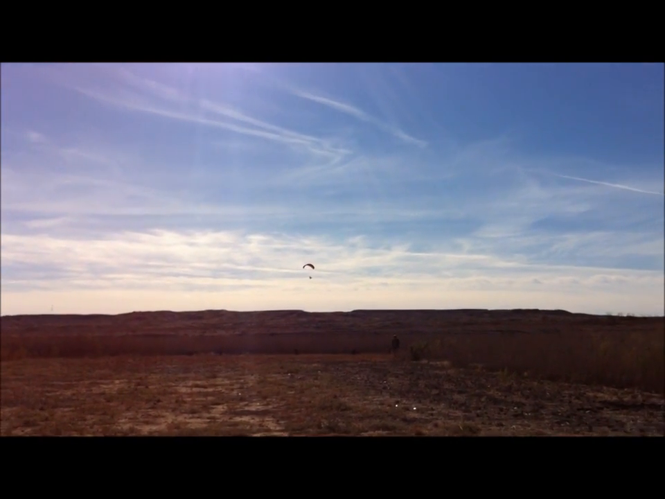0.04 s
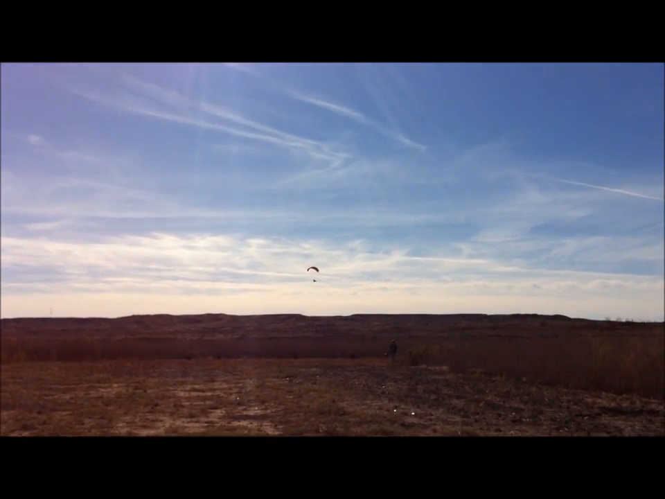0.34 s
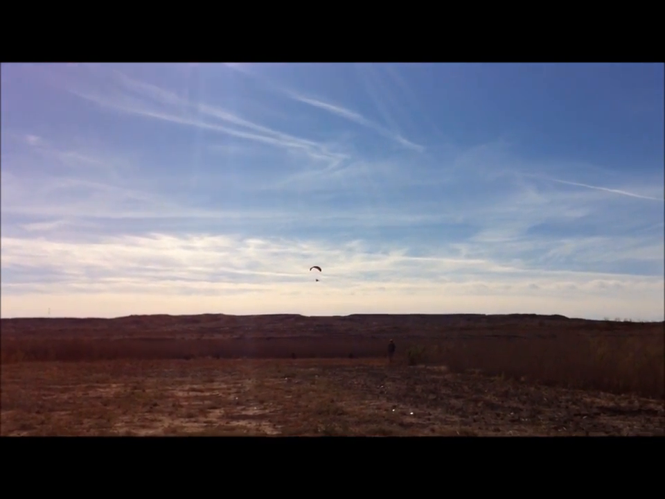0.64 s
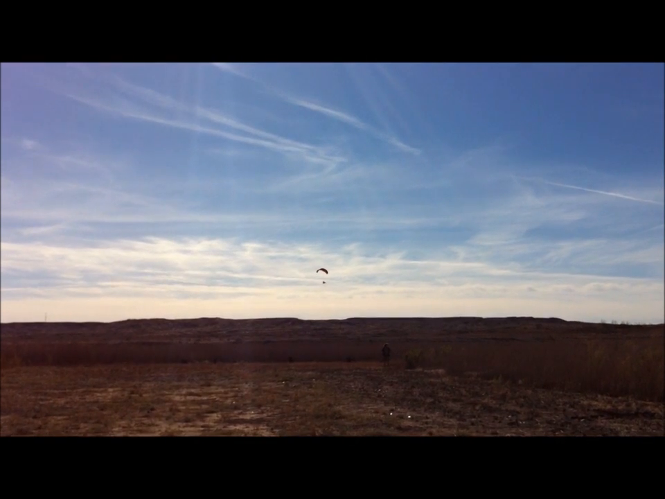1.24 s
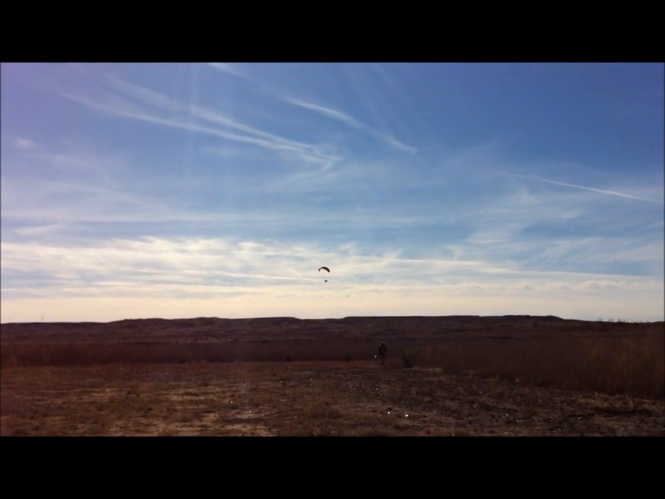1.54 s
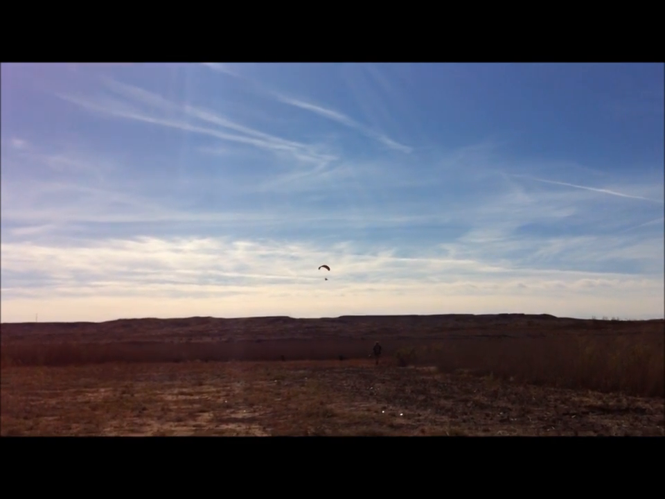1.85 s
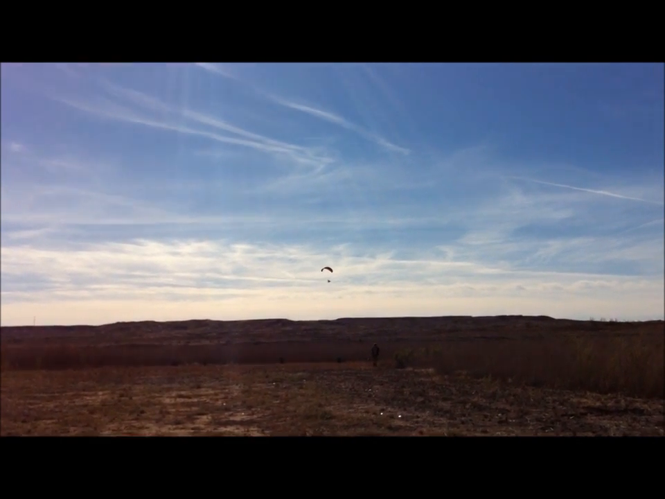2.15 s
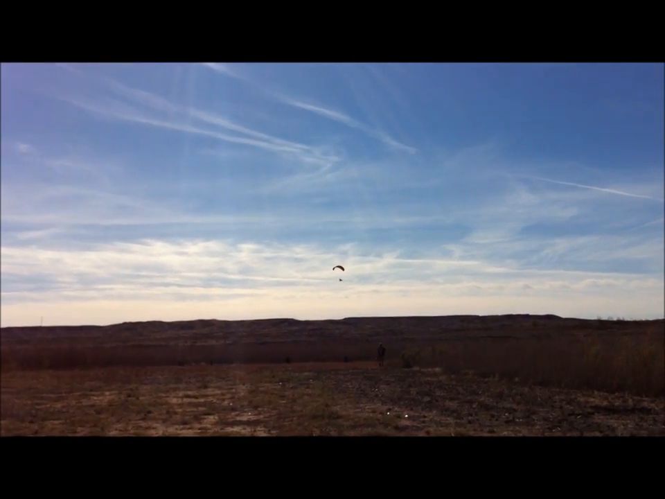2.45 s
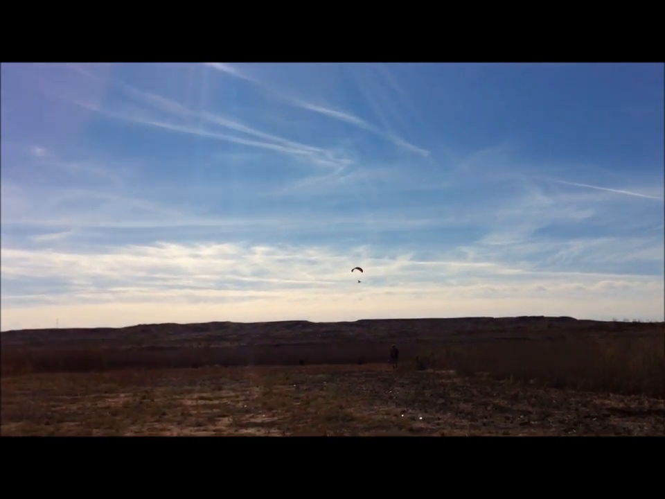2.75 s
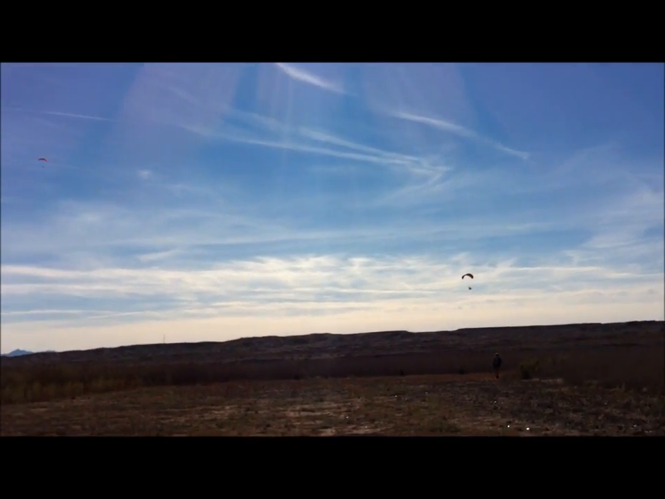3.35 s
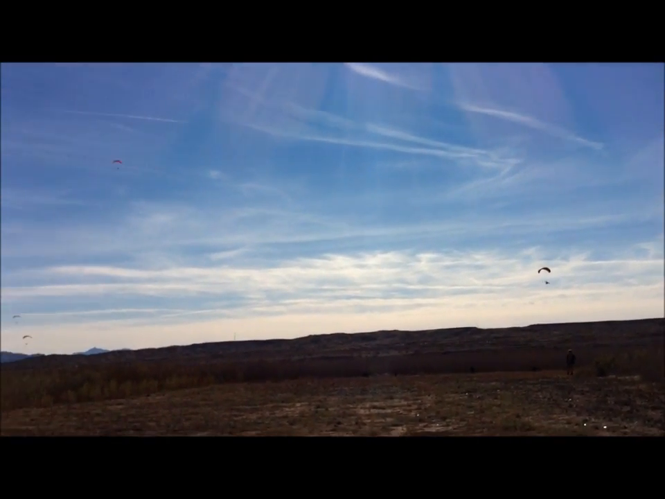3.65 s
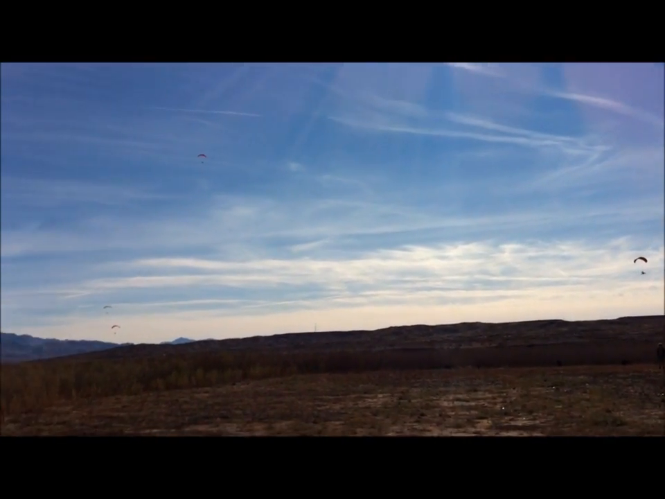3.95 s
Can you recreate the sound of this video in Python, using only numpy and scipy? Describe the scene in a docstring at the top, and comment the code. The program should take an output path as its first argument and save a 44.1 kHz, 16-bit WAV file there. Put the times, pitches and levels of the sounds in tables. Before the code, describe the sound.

A distant powered paraglider drones steadily, with light wind rumble and a few handling clicks.

```python
"""A powered paraglider drones far off over open dry land, slowly getting nearer and brighter.
Its engine and geared-down propeller make two interleaved buzzes that flutter in the moving air,
over a rush of air chopped by the blades. Close up, light wind rumbles and bumps on the microphone,
and a hand shifting on the camera makes a short run of clicks and rubs. Faint hiss lies under it all."""
import sys
import numpy as np
from scipy import signal
from scipy.fft import rfft, irfft
from scipy.io import wavfile
from scipy.ndimage import uniform_filter1d

SR = 44100
rng = np.random.default_rng(int(sys.argv[2]) if len(sys.argv) > 2 else 0)


def wav_record(signal):
    """Record a signal, one row per channel, as 16-bit PCM in the file named by sys.argv[1]."""
    frames = np.transpose(np.atleast_2d(signal))
    bounded = np.clip(frames, -1, 1)
    # unit amplitude maps onto the largest positive 16-bit level
    quanta = np.round(bounded * 32767).astype(np.int16)
    wavfile.write(sys.argv[1], SR, quanta)


N = 176400
T = np.arange(N) / SR

# engine speed (time [s], firing rate [Hz])
ENGINE_SPEED = [(0, 95.25), (.8, 95.56), (1.15, 95.4), (1.45, 95.58), (2.15, 95.38), (2.52, 94.84),
                (3.1, 94.82), (3.7, 94.44), (4, 94.15)]
# how the drone carries to the microphone (time [s], gain [dB], low-middle gain [dB], treble gain [dB])
CARRY = [(0, -7, 6.5, -3), (.3, -1, 0.5, -22), (.7, -2.5, -2, -12), (1.25, -4, -2.8, -8.5),
         (1.8, -3.5, 0, -4), (2.35, -2.2, 1.5, -4), (2.65, -1.9, -.5, -3.5), (2.87, -1, -1, 1.5),
         (3.1, -2, -1.5, 3.5), (3.62, -1.5, -1, 5), (4, -1.5, -1, -8)]
# exhaust harmonics from the first up, before the carry gains (level [dB])
EXHAUST_HARMONICS = [-68, -52, -57, -55.5, -54, -58, -63.5, -61, -69, -65.5, -96, -74, -63, -65.5, -66.5,
                     -68.5, -67, -69.5, -84, -72, -78.5, -81.5, -79.5, -85]
# propeller harmonics from the first up, before the carry gains (level [dB])
BLADE_HARMONICS = [-91, -54, -58, -61, -59, -65.5, -67, -71, -64.5, -57.5, -56, -66, -58, -62.5, -64.5,
                   -70.5, -81.5, -67.5, -75, -68, -73.5]
# air rushing off the propeller (frequency [Hz], relative level [dB])
RUSH_SPECTRUM = [(60, -31), (130, -17), (300, 3), (500, 5), (700, -0.5), (950, -0.5), (1250, 1.5),
                 (1680, -4.5), (1850, -8.5), (2500, -15.5), (3300, -41)]
# wind rumble on the microphone (frequency [Hz], relative level [dB])
WIND_SPECTRUM = [(20, -24), (42, -53), (65, -14.5), (90, -4), (140, 3), (220, -1.5), (350, -29), (700, -10),
                 (2000, -51.5)]
# gusts at the microphone (time [s], level [dB])
GUSTS = [(0, -43.5), (.4, -57.5), (.56, -50.5), (.7, -66), (1.3, -62), (1.47, -49), (1.65, -64.5),
         (2.03, -48.5), (2.35, -73.5), (2.85, -65), (3.12, -50.5), (3.65, -54.5), (3.85, -66), (4, -45)]
# puffs of wind, before the microphone's response (time [s], peak level [dB], pitch [Hz])
PUFFS = [(.060, -29, 217), (0.097, -29.5, 165), (0.172, -26, 189), (.195, -26, 167), (0.318, -28, 177),
         (0.548, -31.5, 137), (.570, -31, 136), (1.465, -32, 208), (1.494, -28.5, 190), (1.534, -30, 192),
         (1.879, -27, 163), (1.894, -25.5, 202), (2.161, -26, 224), (2.633, -33, 146), (3.108, -32, 140),
         (3.236, -25, 193), (3.364, -30, 175), (3.703, -30, 176)]
# the microphone's response to a puff (frequency [Hz], gain [dB])
PUFF_RESPONSE = [(35, -26), (100, -4), (220, -2), (360, 3.5), (600, 26)]
# handling clicks, before filtering (time [s], snap level [dB], tick level [dB], knock level [dB])
CLICKS = [(.868, -67, -49, -50), (1.4303, -44, -54, -50), (1.7635, -46.5, -48, -55),
          (1.827, -34.5, -47, -28.5), (1.854, -43, -53, -55), (1.8904, -36, -51, -31),
          (1.976, -44, -47, -56), (1.9965, -53, -46, -53), (2.110, -53, -50, -37), (2.155, -48, -72, -25),
          (2.197, -41, -45, -51), (2.2211, -35.5, -62, -24.5), (2.2539, -29, -56, -25.5),
          (2.302, -43, -50, -35), (2.3502, -38, -46, -23.5), (2.3667, -37.5, -50, -25.5)]
# colour of the camera shell (frequency [Hz], gain [dB])
SHELL_RESPONSE = [(1500, -3), (3000, -9), (4300, -8), (5600, -5), (9000, -7), (16000, -4)]
# fingers rubbing on the shell (time [s], level [dB])
RUB_LEVEL = [(1.68, -94), (1.88, -59), (1.93, -71), (1.98, -67), (2.1, -70), (2.265, -94), (2.31, -68.5),
             (2.38, -63), (2.46, -68)]
# the microphone's own hiss (frequency [Hz], relative level [dB])
HISS_SPECTRUM = [(20, 15), (1000, 12.5), (3000, 6.5), (11000, 3.35), (16000, 3)]


def paraglider(blades_per_firing=.8449):
    """Far off, exhaust and propeller buzz, locked together by the reduction drive."""
    firing_hz = curve(ENGINE_SPEED)
    blade_hz = firing_hz * blades_per_firing
    exhaust = buzz(firing_hz, EXHAUST_HARMONICS)
    propeller = buzz(blade_hz, BLADE_HARMONICS) + propeller_rush(blade_hz)
    return amp(curve(CARRY)) * (exhaust + propeller)


def buzz(pulse_hz, levels_db, jitter_s=.00003, pulse_spread=.18, flutter_hz=2.2):
    """A train of sharp, slightly uneven pulses; the air on the way makes each harmonic flutter."""
    mean_hz = pulse_hz.mean()
    log_gain = np.log(amp([levels_db[0], *levels_db, *levels_db[::-1]]))
    lags = signal.hilbert(log_gain).imag[1:len(levels_db) + 1]  # minimum phase keeps the pulses sharp
    turns = np.cumsum(pulse_hz) / SR + pulse_hz * jitter_s * drift(mean_hz / 2)
    out = np.zeros(N)
    for harmonic, (db, lag) in enumerate(zip(levels_db, lags), start=1):
        hz = harmonic * mean_hz
        flutter_db = (2.08 * hz / 1000 - .36) * drift(flutter_hz)  # deeper toward the treble
        out += amp(db + flutter_db + carry_db(hz)) * np.cos(2 * np.pi * harmonic * turns - lag)
    return np.sqrt(2) * out * (1 + pulse_spread * drift(mean_hz / 2))


def propeller_rush(blade_hz, gain_db=-51.5, chop_depth=.23, patch_db=2.5):
    """Patchy air noise, chopped once by every blade."""
    hz, t, spectra = signal.stft(rng.standard_normal(N), SR, nperseg=1024, noverlap=768)
    patches = uniform_filter1d(rng.standard_normal(spectra.shape), size=7, axis=0)
    patches = unit(uniform_filter1d(patches, size=24, axis=1))
    spectra *= colour(RUSH_SPECTRUM, hz)[:, None] * amp(patch_db * patches + carry_db(hz[:, None], t))
    air = signal.istft(spectra, SR, nperseg=1024, noverlap=768)[1][:N]
    chop = 1 + chop_depth * np.cos(2 * np.pi * np.cumsum(blade_hz) / SR)
    return amp(gain_db) * unit(air * chop)


def carry_db(hz, t=T, low_middle_hz=620, middle_hz=980, treble_hz=1770, edge_width_hz=150):
    """Over the distance to the microphone, the treble and the low middle swell and fade separately."""
    top, middle = (.5 + .5 * np.tanh((hz - edge) / edge_width_hz) for edge in (treble_hz, middle_hz))
    treble = .81 * top + .19 * middle
    octaves_away = np.log2((hz + 1) / low_middle_hz)
    low_middle = np.exp(-.5 * (octaves_away / .45) ** 2)
    return low_middle * curve(CARRY, column=2, t=t) + treble * curve(CARRY, column=3, t=t)


def wind_rumble(lump_db=3, lump_hz=25):
    """Wind on the microphone makes a lumpy rumble that follows the gusts."""
    rumble = shaped(rng.standard_normal(N), WIND_SPECTRUM)
    return amp(curve(GUSTS)) * unit(rumble * amp(lump_db * drift(lump_hz)))


def wind_bumps(fall_cycles=.65, sag_per_cycle=.32):
    """Each puff swings the microphone for about two cycles, sagging in pitch."""
    out = np.zeros(N)
    for time_s, db, hz in PUFFS:
        near = abs(T - time_s) < 3 / hz
        cycles = (T[near] - time_s) * hz
        width = fall_cycles * np.where(cycles < 0, .37 ** .5, 1)  # rises faster than it falls
        turns = (1 - np.exp(-sag_per_cycle * cycles)) / sag_per_cycle
        out[near] += amp(db) * np.exp(-.5 * (cycles / width) ** 2) * np.cos(2 * np.pi * turns)
    return shaped(out, PUFF_RESPONSE)


def handling_clicks(snap_s=.00028, rattle_db=-3, grain_db=4,
                    tick_hz=2250, tick_s=.001, knock_hz=720, knock_s=.00095, low_cut_hz=440):
    """Right at the microphone, the camera shell snaps and rattles, with a short tick and a dead knock."""
    snaps, ticks, knocks = np.zeros((3, N))
    size = 3000
    t = T[:size]
    for time_s, snap_db, tick_db, knock_db in CLICKS:
        start = round(time_s * SR)
        span = slice(start, start + size)
        rattle_s = .035 * np.sqrt(amp(snap_db))  # weaker clicks die sooner
        roughness = unit(uniform_filter1d(rng.standard_normal(size), size=40))
        grains = unit(amp(grain_db * roughness))
        envelope = np.exp(-t / snap_s) + amp(rattle_db) * grains * np.exp(-t / rattle_s)
        snaps[span] += amp(snap_db) * rng.choice([-1, 1], size) * envelope
        ticks[span] += amp(tick_db) * np.exp(-t / tick_s) * np.sin(2 * np.pi * tick_hz * t)
        knocks[span] += amp(knock_db) * np.exp(-t / knock_s) * np.sin(2 * np.pi * knock_hz * t)
    low_cut = signal.butter(2, low_cut_hz, "highpass", fs=SR, output="sos")
    return shaped(snaps, SHELL_RESPONSE) + ticks + signal.sosfilt(low_cut, knocks)


def finger_rub(slips_per_s=1900, slip_s=.0004):
    """Close to the microphone, fingers scrape over the shell in a dense run of tiny slips."""
    sliding = (T > RUB_LEVEL[0][0]) * (T < RUB_LEVEL[-1][0])
    slips = (rng.random(N) < slips_per_s / SR) * rng.exponential(1, N)
    envelope = signal.lfilter([1], [1, -np.exp(-1 / (slip_s * SR))], slips)
    scrape = shaped(envelope * rng.standard_normal(N), SHELL_RESPONSE)
    return sliding * amp(curve(RUB_LEVEL)) * unit(scrape)


def microphone_hiss(level_db=-65):
    """The microphone's own steady noise floor."""
    return amp(level_db) * unit(shaped(rng.standard_normal(N), HISS_SPECTRUM))


def amp(db):
    """Decibels to gain."""
    return 10 ** (np.asarray(db) / 20)


def unit(x):
    """Scales to rms 1."""
    return x / np.sqrt(np.mean(x ** 2) + 1e-20)


def curve(table, column=1, t=T):
    """One column of a time table, joined by straight lines."""
    columns = np.transpose(table)
    return np.interp(t, columns[0], columns[column])


def colour(spectrum, hz):
    """Gain of a spectrum table at the given frequencies."""
    table_hz, db = np.transpose(spectrum)
    return amp(np.interp(np.log(hz + 1), np.log(table_hz), db))


def shaped(x, spectrum):
    """Filters a sound by a spectrum table."""
    return irfft(rfft(x) * colour(spectrum, np.fft.rfftfreq(N, 1 / SR)), N)


def drift(rate_hz):
    """Smooth random motion of rms about 1."""
    size = 4096
    hz = np.fft.rfftfreq(size, 2 * N / SR / size)
    slow = irfft(rfft(rng.standard_normal(size)) / (1 + (hz / rate_hz) ** 2))
    return np.interp(np.arange(N), np.linspace(0, 2 * N, size), unit(slow))


def scene():
    """The far drone over open land, with wind and handling close up on one microphone."""
    return (paraglider() + wind_rumble() + wind_bumps() + handling_clicks() + finger_rub())[None]


def record(dry):
    """Adds the microphone's hiss, then cuts the treble above 15.9 kHz."""
    low_pass = signal.firwin(511, 15900, window=("kaiser", 9), fs=SR)
    return signal.oaconvolve(dry + microphone_hiss(), low_pass[None], "same")


dry = scene()
out = record(dry)
wav_record(out)
```